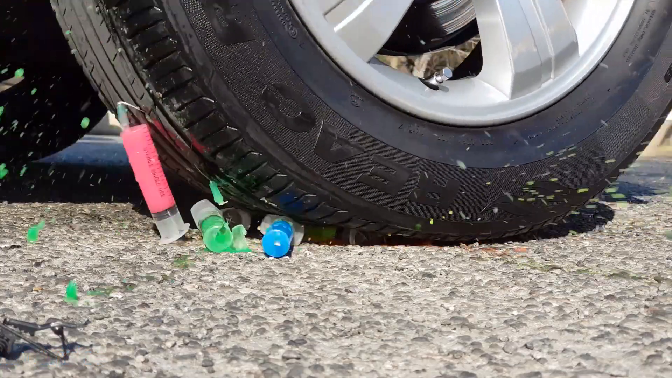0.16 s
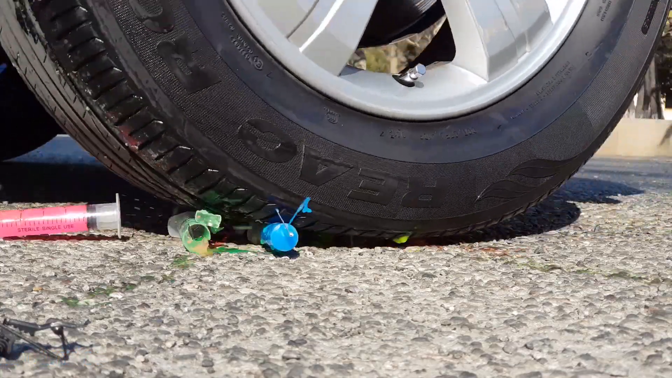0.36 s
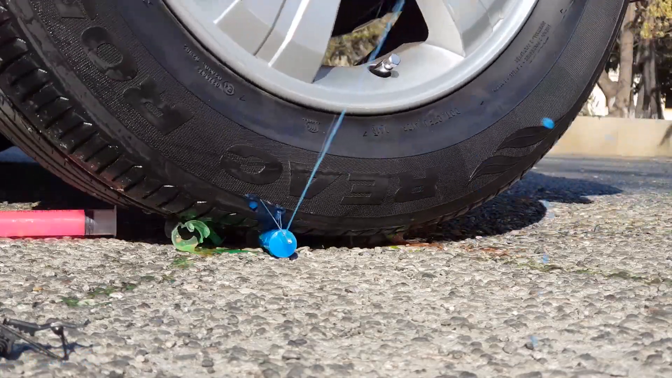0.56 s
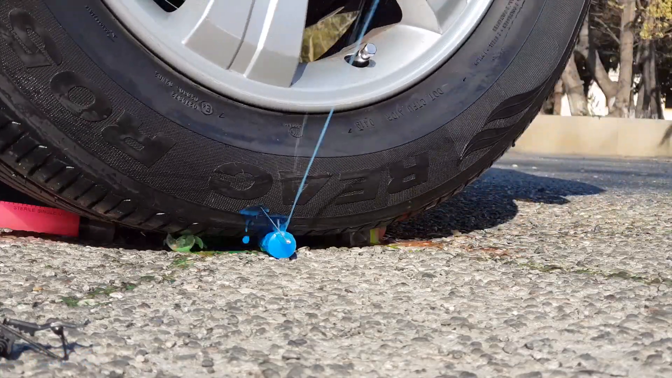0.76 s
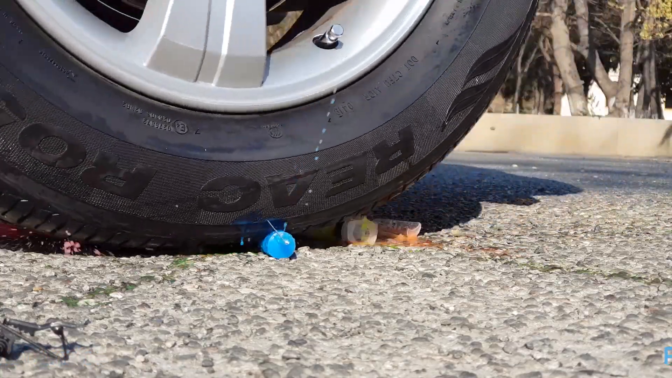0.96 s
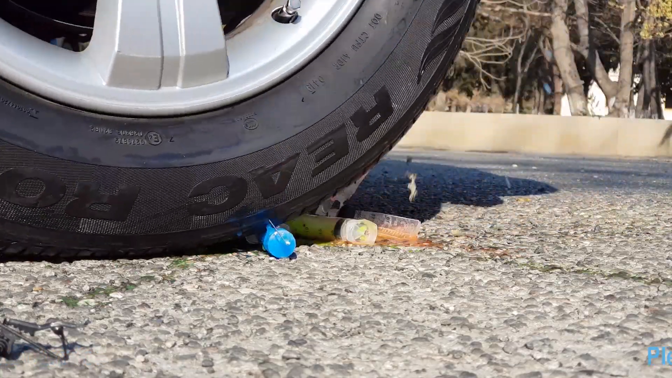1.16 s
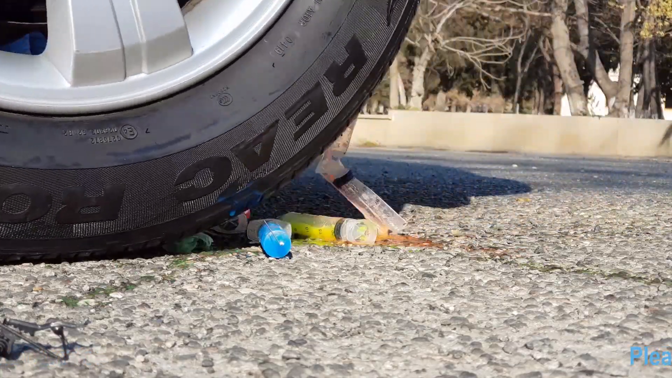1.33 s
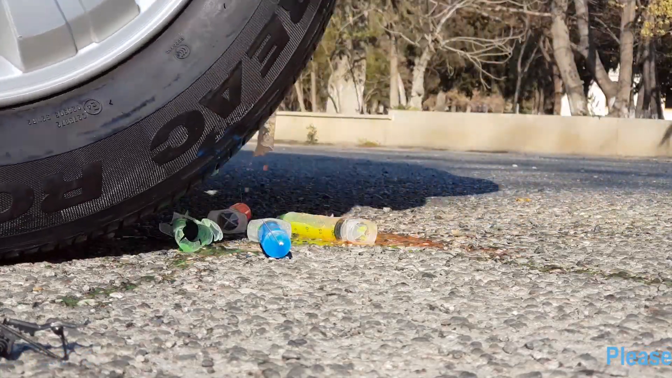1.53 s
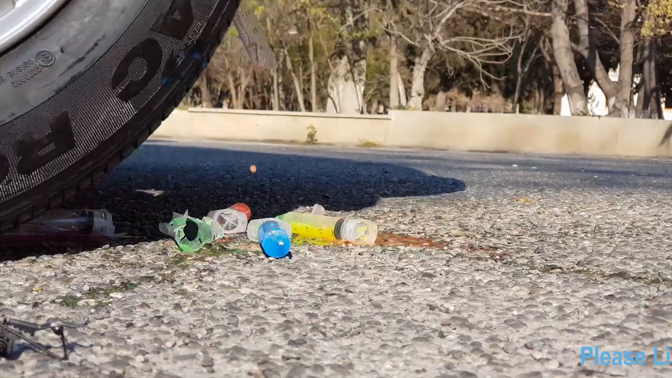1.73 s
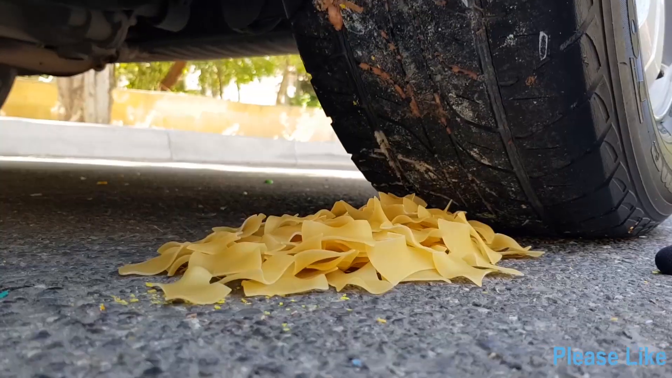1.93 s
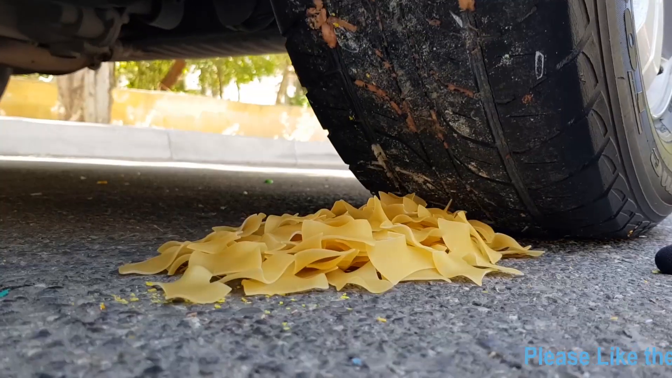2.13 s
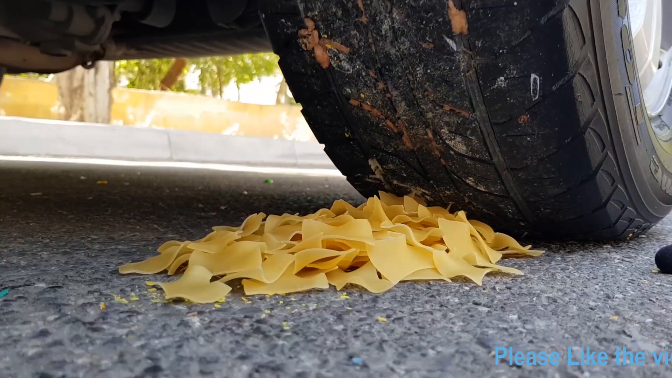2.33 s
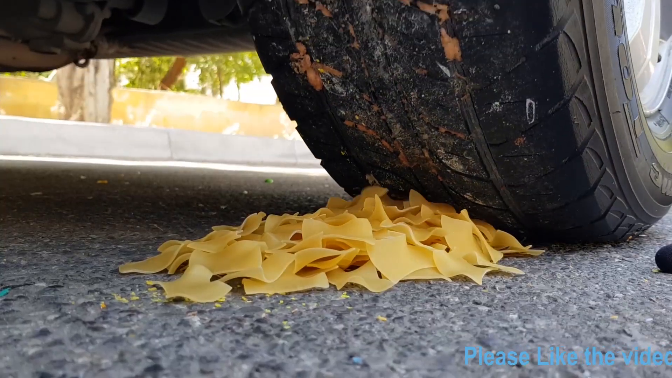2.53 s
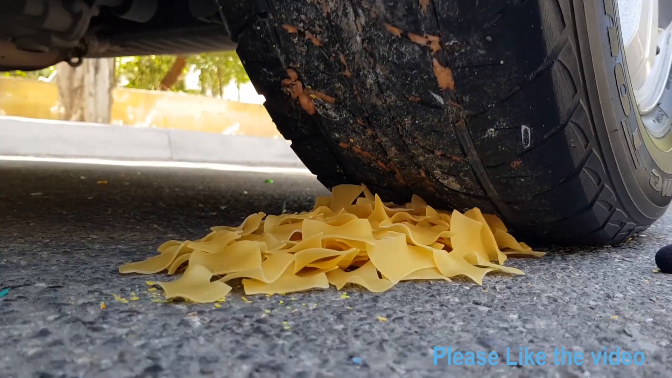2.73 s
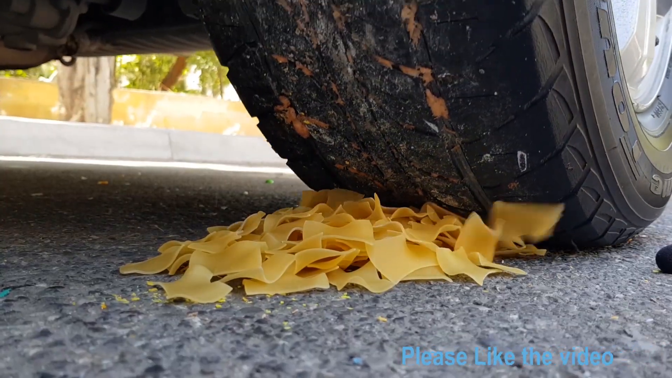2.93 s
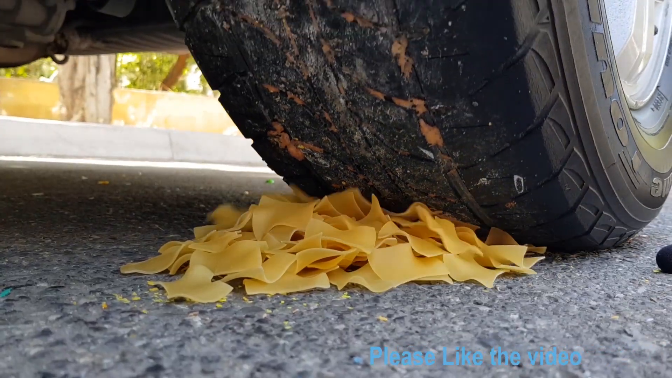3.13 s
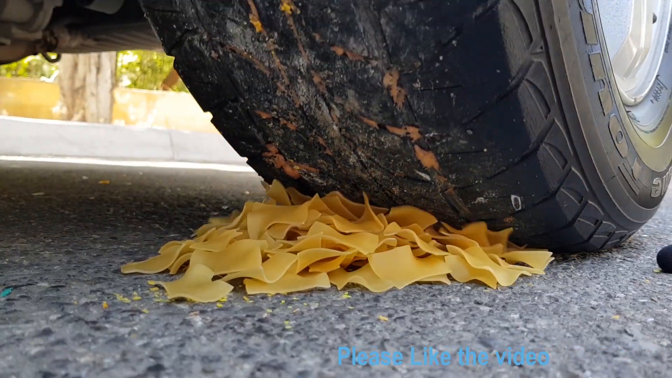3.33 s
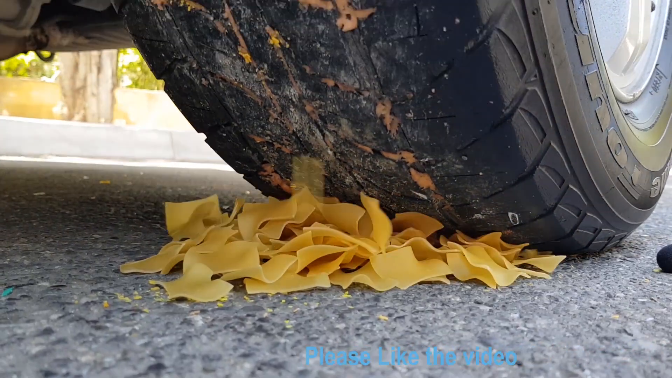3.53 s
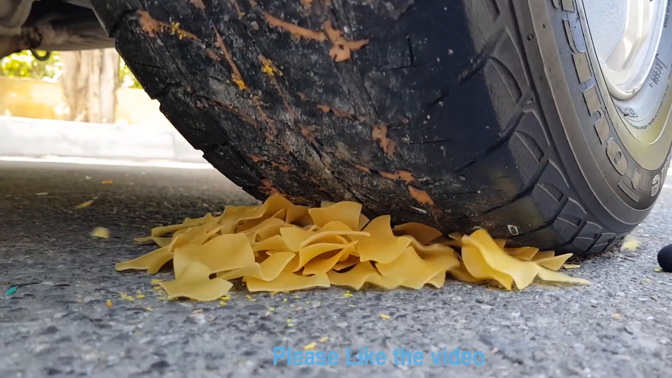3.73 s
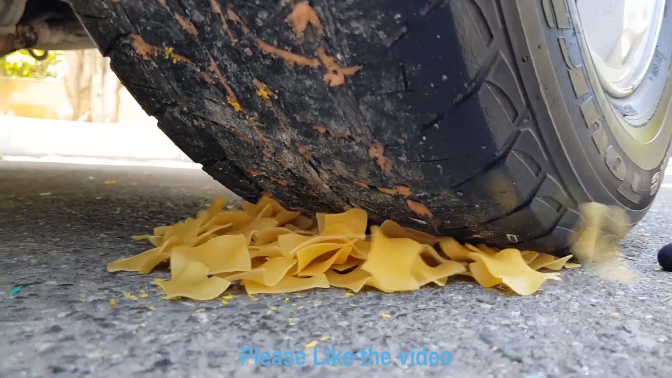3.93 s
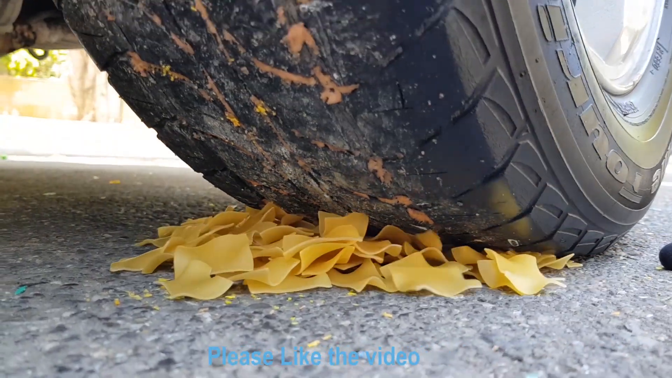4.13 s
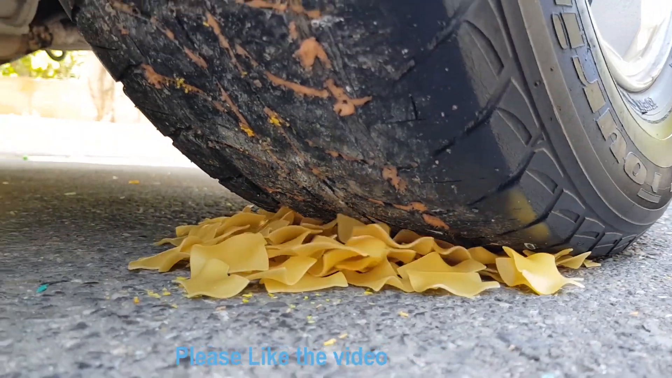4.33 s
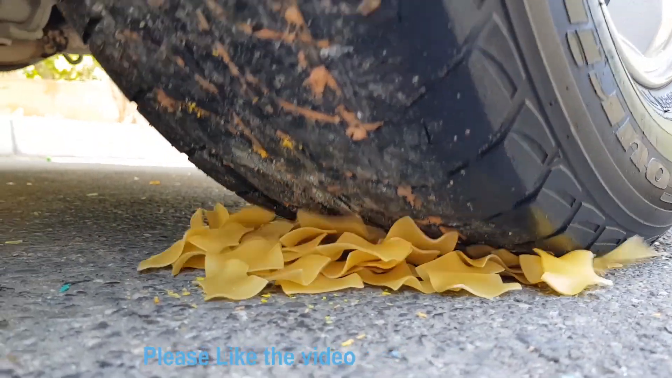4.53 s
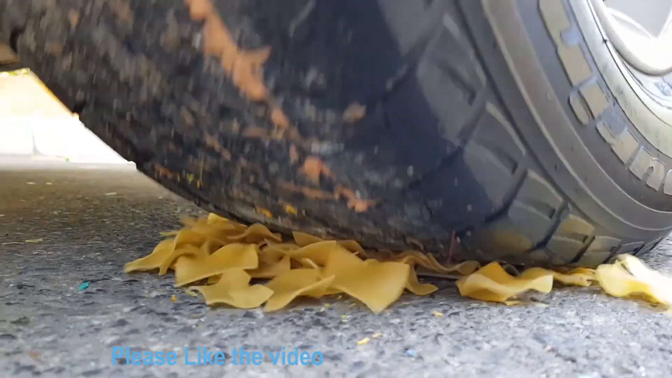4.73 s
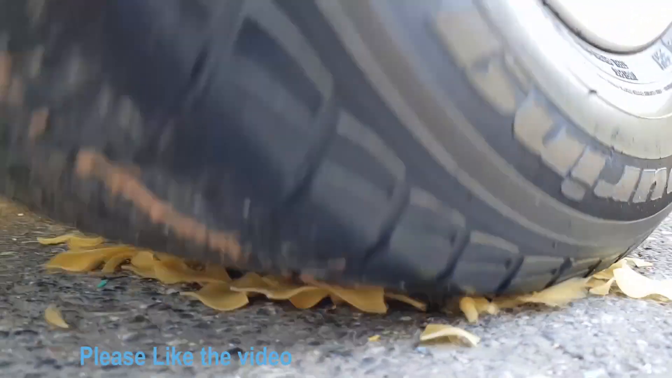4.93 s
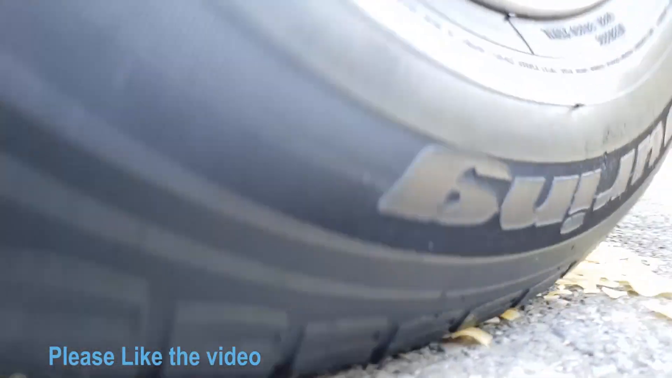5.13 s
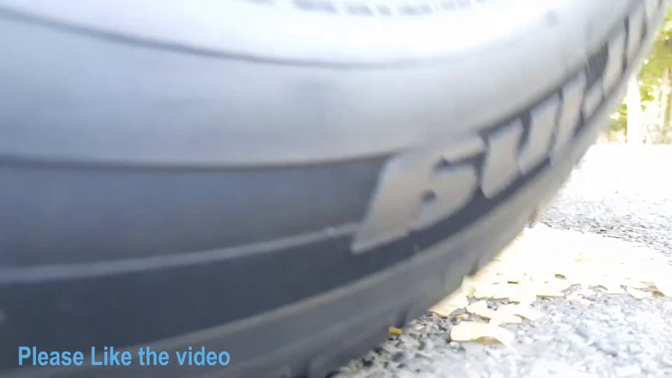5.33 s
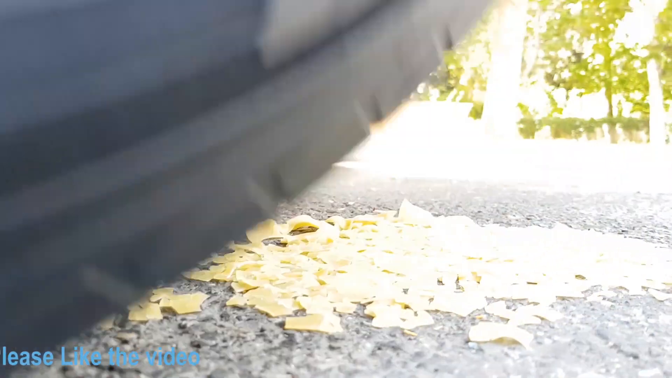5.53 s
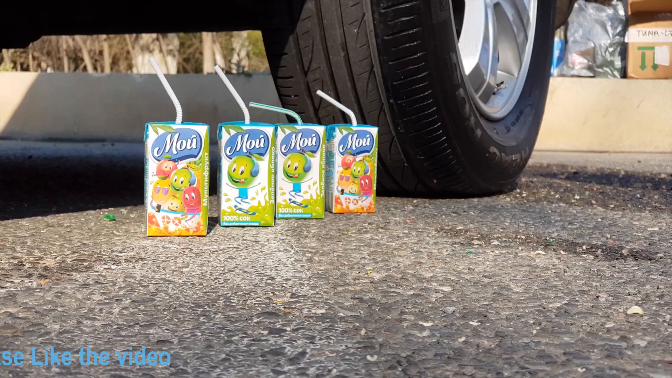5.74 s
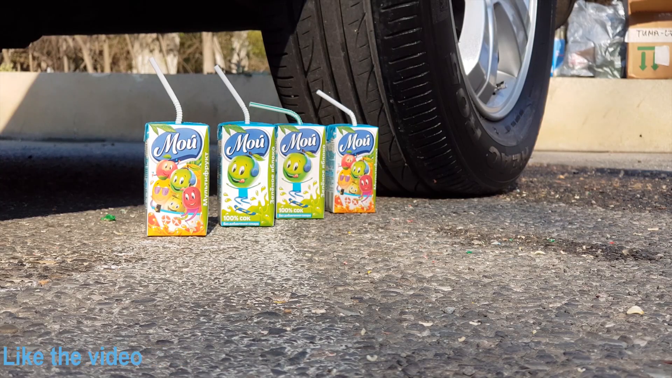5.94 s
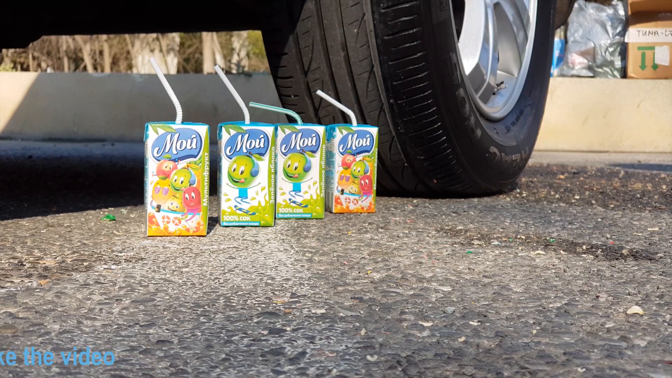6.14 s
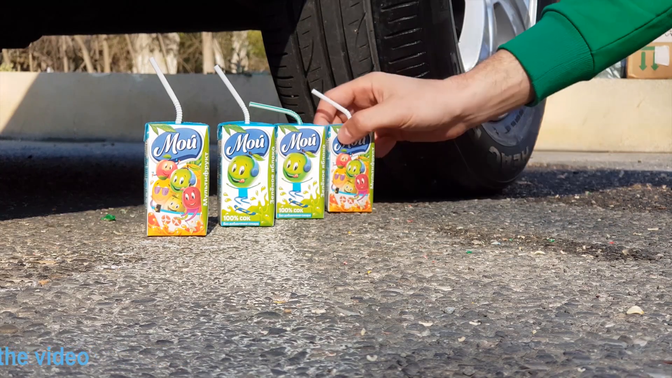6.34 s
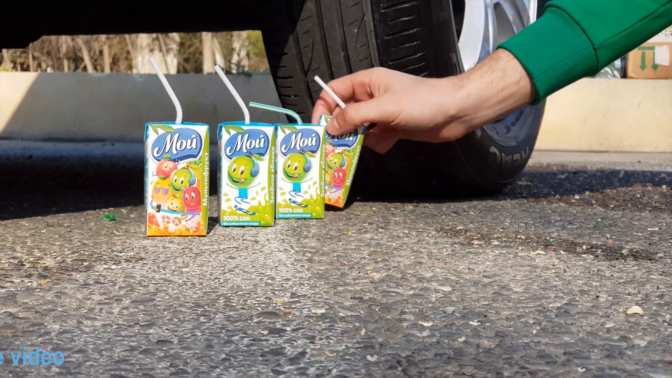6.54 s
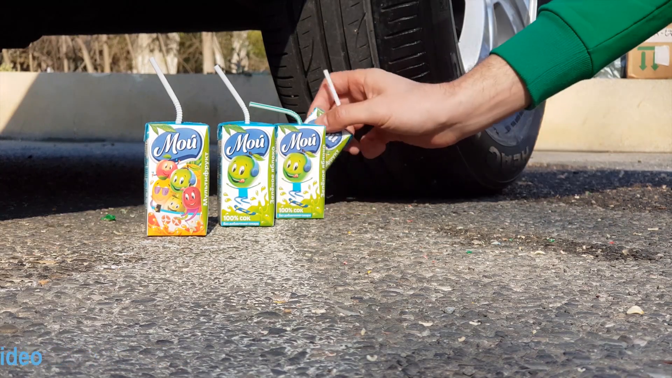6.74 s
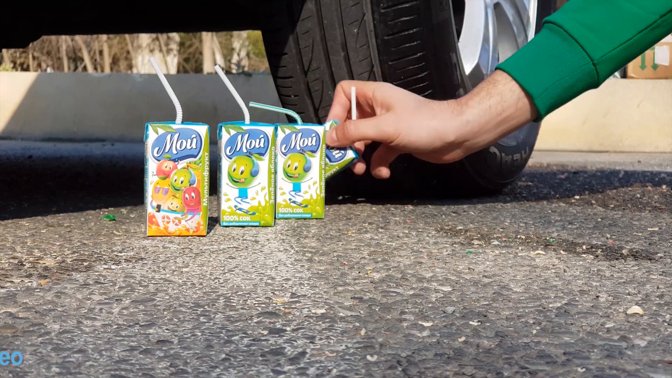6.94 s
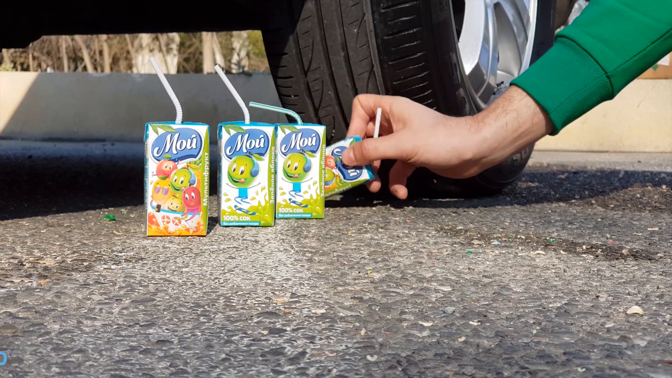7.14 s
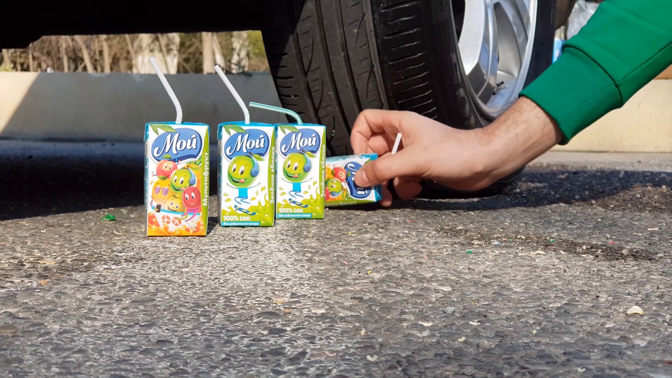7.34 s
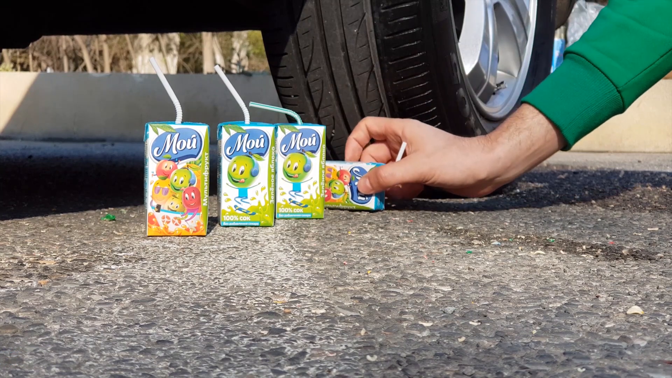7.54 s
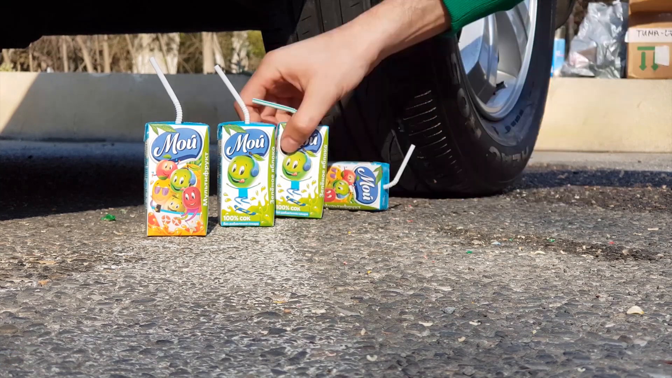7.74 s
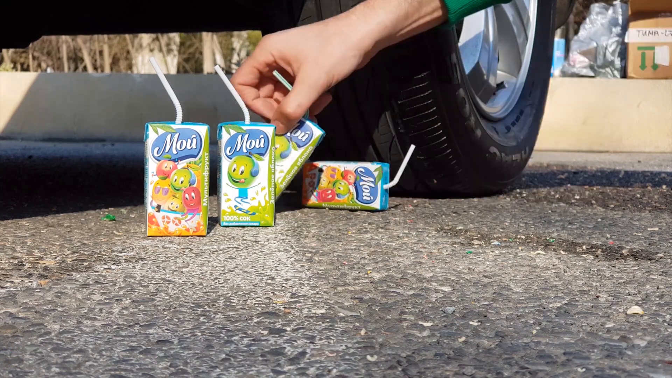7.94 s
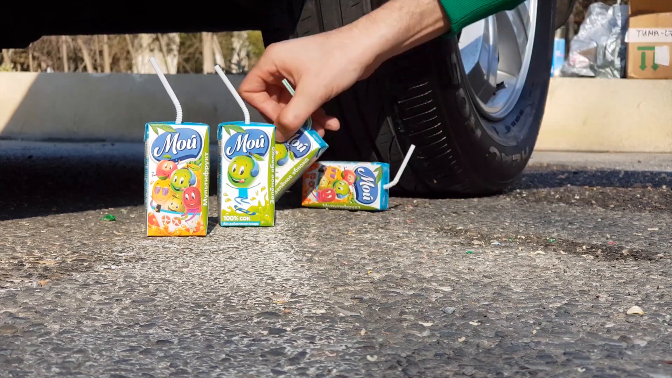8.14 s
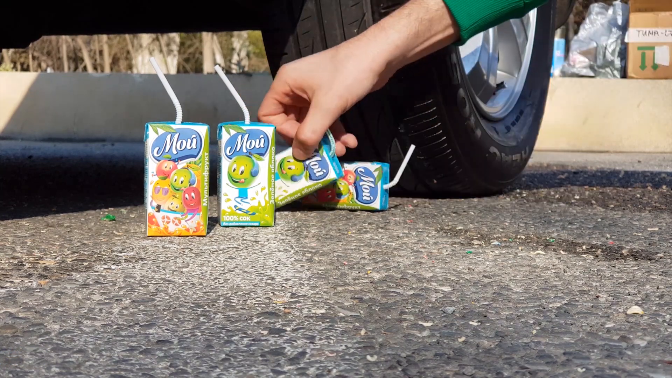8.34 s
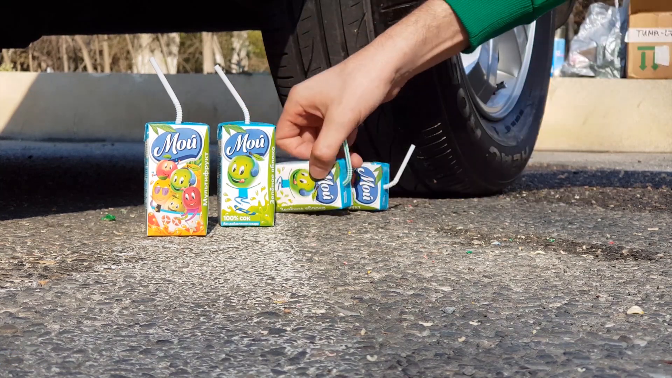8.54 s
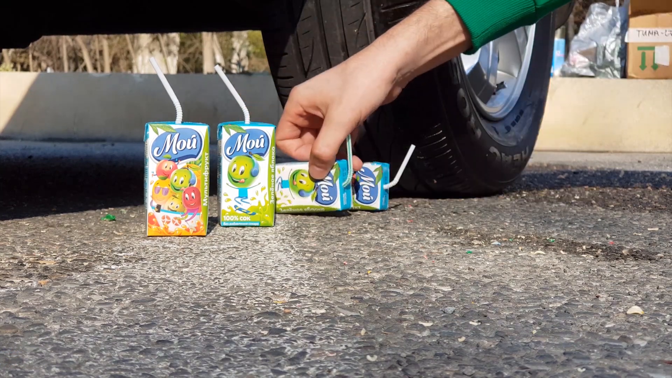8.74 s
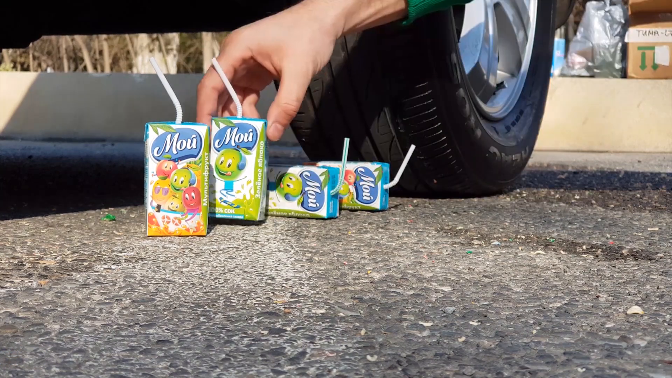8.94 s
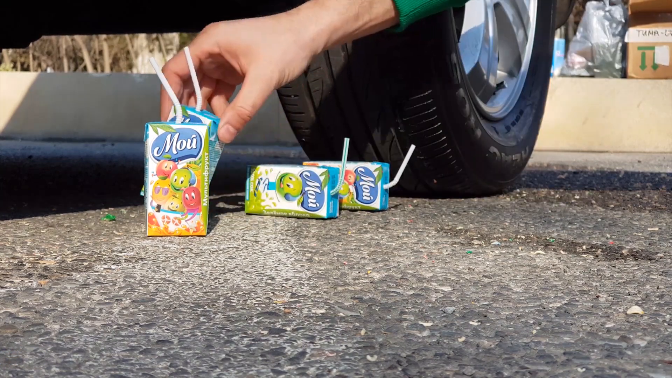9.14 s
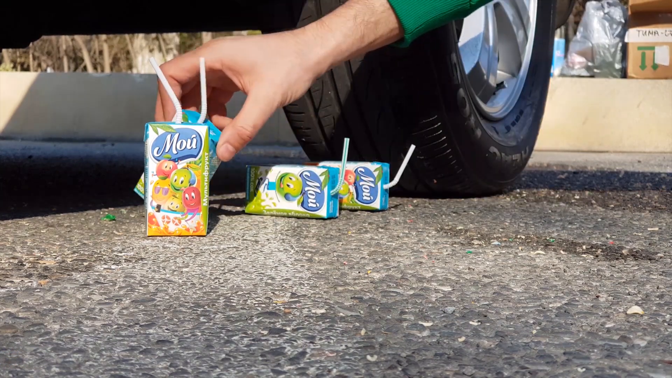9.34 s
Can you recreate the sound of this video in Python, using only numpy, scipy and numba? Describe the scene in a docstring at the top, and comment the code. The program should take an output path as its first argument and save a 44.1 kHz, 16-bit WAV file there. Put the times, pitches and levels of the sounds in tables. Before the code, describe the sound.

Outdoors, very close to the ground, a car tyre breaks plastic syringes with sharp bright clicks, hollow barrel knocks and grainy splintering. After a short lull, it creeps onto dry pasta, which snaps and crackles densely over low thumps, then rolls through. The crunch stops, and low uneven wind buffets the microphone over faint town hiss.

```python
"""Over faint town hiss, plastic syringes crack under a car tyre: clicks, barrel resonances, grainy tails.
The tyre then crushes a heap of dry pasta: noise bursts and crackle, tones and filtered noise in the closing gap.
Decaying low sines thump tyre and ground throughout the crushing; sparse ticks of debris follow the breaks.
Last, slow-gusting noise bands and low decaying sines buffet the microphone over the distant town.
The sum clips at full scale on the loudest snaps and loses its extreme treble."""
import sys
import numpy as np
from scipy import signal
from scipy.fft import rfft, irfft
from scipy.io import wavfile
from scipy.ndimage import uniform_filter1d
from numba import njit

SR = 44100
rng = np.random.default_rng(int(sys.argv[2]) if len(sys.argv) > 2 else 0)


def wrap_up_sound(samples):
    """Save the sound to the file named by the first command line argument, as 16-bit audio."""
    columns = np.atleast_2d(samples).T
    # keep every value between -1 and 1, then stretch to whole-number steps
    tamed = np.clip(columns, -1, 1)
    steps = np.round(tamed * 32767).astype(np.int16)
    wavfile.write(sys.argv[1], SR, steps)


N = 413658

# Steady background. Each row: start in seconds, levels in dB of town, hum and light wind,
# deep wind band in dB re upper band.
BACKGROUND = [(0, -45, -66, -70, 14), (1.831, -42.5, -53, -57.5, 25.5), (2.03, -42, -54, -60.5, 22.5),
              (3.95, -45.5, -56, -65, 16), (5.099, -58, -61.5, -63.5, 3), (5.673, -38.5, -48.5, -60, -4),
              (6.312, -51, -67, -60, 0)]
# Strong wind. Each row: time in seconds, level of the upper band in dB.
GUSTS = [(5.67, -35), (5.78, -29.5), (5.98, -40), (6.08, -33.5), (6.36, -31.5), (6.55, -40.5),
         (6.65, -37.5), (6.85, -44.5), (7.1, -37.5), (7.65, -49), (7.83, -41.5), (7.96, -32), (8.2, -36.5),
         (8.36, -30.5), (8.58, -39.5), (8.66, -29.5), (8.82, -32.5), (8.93, -46), (9.0, -34), (9.08, -48),
         (9.22, -38.5), (9.38, -52)]
# Crushing. Each row: time in seconds, crackle level in dB, relative gap drive in dB, gap pitch in Hz.
CRUSHING = [(2.27, -41, 5, 2350), (2.445, -25.5, -13, 2330), (2.472, -16, -33, 710),
            (2.505, -18.5, -3, 725), (2.55, -29, -15, 761), (2.62, -17.5, -20, 1000),
            (2.84, -26.5, -6.5, 769), (3.01, -20, 1, 1100), (3.28, -34, -2.5, 1053),
            (3.33, -15, -12.5, 850), (3.4, -7.5, -7, 900), (3.42, -23, -2, 900), (3.44, -12, -7, 999),
            (3.67, -14.5, -5, 1100), (3.95, -19, -3.5, 1120), (4.05, -28, 3.5, 1450),
            (4.2, -24, -17.5, 1345), (4.42, -34.5, -22, 1395), (4.57, -13, -6.5, 1000),
            (4.73, -10.5, -10.5, 1311), (4.91, -12.5, -1, 1083), (5.06, -14.5, -4.5, 1350),
            (5.17, -26.5, 0, 1570), (5.22, -52.5, -0.5, 1850), (5.36, -69, -5, 1900)]
# Loud pasta snaps. Each row: time in seconds, relative level in dB, T60 in seconds,
# relative gap ring level in dB, gap ring pitch in Hz.
LOUD_SNAPS = [(2.2693, -5, 0.0016, -4.5, 2120), (2.336, -5, 0.0023, -9, 2100),
              (2.402, -3.5, 0.0026, -6, 2200), (2.427, -12.5, 0.0072, -21, 660),
              (2.5035, -11, 0.0083, -14.5, 620), (2.609, -6, 0.019, -21, 780),
              (2.617, -20, 0.0096, -33, 1080), (2.646, 1, 0.011, -11.5, 1680),
              (2.6561, -5, 0.022, -18.5, 790), (2.6829, -4, 0.02, -16, 2440), (2.697, -2, 0.015, -4.5, 930),
              (2.725, -2.5, 0.0056, -4.5, 670), (2.7663, -7, 0.003, -34, 730), (2.776, -4, 0.007, -12, 790),
              (2.7987, -3.5, 0.034, -7, 600), (2.8152, -4, 0.039, -14, 676), (2.8338, -4, 0.016, -17, 724),
              (2.8504, -2, 0.0048, -7, 750), (2.8616, 4, 0.0032, -16.5, 880),
              (2.8706, -0.5, 0.013, -11.5, 800), (2.876, -2, 0.012, -19, 1030),
              (2.8856, 1.5, 0.0161, -9, 840), (2.8936, -3, 0.0055, -19, 910),
              (2.9033, -8, 0.0044, -9.5, 1580), (2.9183, 0, 0.0069, -8.5, 824),
              (2.9317, -5, 0.0048, -2, 840), (2.943, -3.5, 0.029, -11, 870), (2.9497, 3.5, 0.014, -16, 645),
              (2.9646, -2, 0.0059, -7, 750), (2.9795, -5.5, 0.059, -3, 1520),
              (2.9968, -2.5, 0.015, -3.5, 880), (3.0037, -0.5, 0.01, -5.5, 1185),
              (3.0212, 0.5, 0.0264, -9, 1200), (3.031, -4.5, 0.011, -15.5, 840),
              (3.0447, -12.5, 0.004, -10, 1270), (3.0578, -5.5, 0.0084, -9, 730),
              (3.0646, 2.5, 0.031, -5.5, 1230), (3.0847, -1.5, 0.015, -2, 1250),
              (3.0914, -5, 0.049, -7.5, 910), (3.1005, -5, 0.015, -0.5, 1230),
              (3.1396, -1.5, 0.0086, -4.5, 890), (3.15, 7.5, 0.0098, -11.5, 1030),
              (3.1568, 6, 0.0051, -2.5, 1220), (3.1627, 1, 0.025, -7, 1100),
              (3.176, 0.5, 0.013, -0.5, 1130), (3.1851, -2.5, 0.036, -3, 1290),
              (3.1998, -7.5, 0.045, -7.5, 1070), (3.2178, 0.5, 0.029, -9, 830),
              (3.2387, -1.5, 0.0091, -11, 890), (3.247, -2, 0.0092, -24, 1200),
              (3.254, 0, 0.0036, -23.5, 920), (3.2648, -6, 0.0057, -24.5, 1750),
              (3.2718, -6, 0.026, -26, 1110), (3.3, -1, 0.0037, -16.5, 775), (3.313, -3, 0.01, -15.5, 1020),
              (3.3152, 0, 0.03, -9, 700), (3.3297, -7, 0.0085, -4, 2110), (3.336, -4.5, 0.013, -11.5, 740),
              (3.3452, -1.5, 0.017, -10, 710), (3.365, -7, 0.03, -3, 730), (3.3765, -6.5, 0.014, -9, 950),
              (3.3929, -5, 0.019, -6, 2310), (3.4305, -2.5, 0.05, -10.5, 1100),
              (3.462, 5, 0.011, -7.5, 810), (3.487, -6, 0.037, -8, 920), (3.5053, -5, 0.0028, 2, 595),
              (3.509, 4, 0.018, -6, 940), (3.5235, -2, 0.0083, -13.5, 1320),
              (3.5456, -3.5, 0.0031, -4, 2370), (3.553, 0, 0.0021, -17, 860), (3.5702, -2, 0.052, -12, 740),
              (3.5909, -1.5, 0.023, 1.5, 1050), (3.6, -1.5, 0.0063, -18.5, 960),
              (3.6282, -0.5, 0.0098, -5, 1020), (3.638, -11, 0.0039, -3, 1020),
              (3.646, -5, 0.0092, -13, 1390), (3.6525, 0.5, 0.013, -21, 1040),
              (3.663, -6, 0.017, -13.5, 920), (3.6897, -5.5, 0.009, -9, 1600),
              (3.7102, -3, 0.006, -6, 1100), (3.7152, -8, 0.011, -6.5, 860), (3.73, -13, 0.013, -8, 1140),
              (3.7395, -6, 0.059, -10.5, 760), (3.7809, -12.5, 0.0033, -4, 1220),
              (3.7946, -5, 0.0066, -7.5, 1270), (3.807, -6, 0.043, -10.5, 1340),
              (3.8224, -3, 0.038, -7, 970), (3.8546, 0, 0.018, -9, 750), (3.8729, -2, 0.0034, -12, 1170),
              (3.879, -3, 0.004, -13, 1200), (3.8978, 1.5, 0.019, -18, 1300),
              (3.909, -4.5, 0.0083, -20.5, 825), (3.929, 0, 0.027, -10, 820),
              (3.9432, 0, 0.039, -14.5, 1220), (3.9698, 0, 0.0049, -25, 1280),
              (3.987, 1.5, 0.0049, -22, 700), (4.0001, -4, 0.0052, -8, 1800), (4.0107, -4, 0.013, 4, 1500),
              (4.041, -5, 0.0064, 0, 1420), (4.055, -0.5, 0.02, -3, 1480), (4.0701, -3, 0.021, -0.5, 1210),
              (4.0852, -12, 0.0042, -19, 1550), (4.111, -2, 0.011, -9, 1280),
              (4.1234, -6, 0.0127, -14.5, 1250), (4.143, -8, 0.0039, -35, 1530),
              (4.154, -10, 0.0067, -10, 1850), (4.1749, -4.5, 0.016, -24, 1360),
              (4.2005, -6, 0.028, -19.5, 680), (4.225, -7, 0.0073, -26.5, 1390),
              (4.239, -4, 0.0097, -17.5, 1690), (4.2439, 0, 0.018, -18, 770), (4.257, 1, 0.0078, -11, 1550),
              (4.274, -8.5, 0.048, -8.5, 1280), (4.295, -10, 0.0064, -13, 1490),
              (4.302, -8, 0.0045, -8, 1420), (4.3091, -5, 0.028, -9.5, 1360),
              (4.3253, -5.5, 0.0086, -15, 1280), (4.3366, -5, 0.0071, -22, 1190),
              (4.3442, -1, 0.0088, -22.5, 920), (4.37, -5.5, 0.0089, -25, 1290),
              (4.376, -10.5, 0.024, -25, 1170), (4.399, -9, 0.011, -38, 2360),
              (4.408, -8, 0.0052, -42, 1810), (4.4332, -4.5, 0.0078, -20, 1640),
              (4.459, -8, 0.01, -31, 1260), (4.4644, -7.5, 0.011, -27, 1140),
              (4.492, -1, 0.0083, -30.5, 1580), (4.5064, -8, 0.019, -12.5, 915),
              (4.5148, -3, 0.028, -7.5, 1470), (4.5352, 0, 0.018, -10.5, 890),
              (4.5526, -4, 0.0049, -8.5, 1390), (4.5657, 0, 0.034, -11, 1210), (4.613, -3, 0.071, -5, 835),
              (4.6254, -3, 0.0081, -8.5, 1310), (4.7092, -2.5, 0.055, -8, 1110),
              (4.722, -6, 0.074, -7, 1610), (4.749, -5.5, 0.0088, -7, 1440),
              (4.7582, -1, 0.013, -9.5, 1240), (4.78, 2.5, 0.016, -9.5, 1490),
              (4.7962, 3, 0.009, -15, 1380), (4.8051, -4, 0.013, -9, 950), (4.8233, -3, 0.0071, -15.5, 960),
              (4.8636, -6, 0.018, -11, 1120), (4.879, 0, 0.025, -7.5, 980), (4.9062, -1.5, 0.014, 0, 940),
              (4.9503, -4.5, 0.019, -10, 1290), (5.0185, -7, 0.02, -10, 1050),
              (5.048, -22, 0.047, -7, 1130), (5.078, -12, 0.0063, -16, 1780),
              (5.0958, -12, 0.0057, -17, 1950), (5.1093, -13.5, 0.0053, -5, 2100),
              (5.1383, -9.5, 0.0077, -6, 1940), (5.1802, -24, 0.0056, -11, 1740),
              (5.231, -24, 0.013, -4.5, 1900), (5.2521, -34, 0.0042, -27, 2290),
              (5.33, -38.5, 0.0048, -34, 1810), (5.6038, -49, 0.017, -54, 600)]

TYRE_AIR_HZ = 224
ROLLS_ON_S = 4.49  # until then the tyre creeps in jerks


def undb(db):
    """Amplitude factor of a level in dB."""
    return 10 ** (np.asarray(db) / 20)


def unit(x):
    """Scale to rms 1."""
    return x / np.sqrt(np.mean(x ** 2))


def noise():
    """White noise, rms near 1."""
    return rng.standard_normal(N)


def curve(table):
    """Columns of a table, joined by straight lines in time."""
    s, *columns = np.transpose(table)
    return [np.interp(np.arange(N) / SR, s, c) for c in columns]


def held(s, value):
    """The value of the latest event at every sample; the first value before any event."""
    order = np.argsort(s)
    latest = np.searchsorted(s[order], np.arange(N) / SR) - 1
    return value[order][np.clip(latest, 0, None)]


def stretch(column):
    """A column of the background table at every sample."""
    rows = np.array(BACKGROUND)
    return held(rows[:, 0], rows[:, column])


def colour(x, points):
    """Minimum-phase filter through (Hz, dB) points, scaled to power gain 1 on white noise."""
    hz, db = np.transpose(points)
    bin_hz = np.arange(1, 2050) * SR / 4096
    log_gain = np.log(undb(np.interp(np.log(bin_hz), np.log(hz), db)))
    cepstrum = irfft(log_gain)
    cepstrum[1:2048] *= 2  # fold onto positive time
    cepstrum[2049:] = 0
    response = irfft(np.exp(rfft(cepstrum)))[:2048]
    return signal.fftconvolve(x, response / np.sqrt(np.sum(response ** 2)))[:N]


@njit
def svf(x, hz, damp):
    """State-variable band-pass with a moving centre; damp = width / centre, peak gain 1."""
    y, b, l = np.empty(len(x)), 0., 0.
    for i in range(len(x)):
        g = np.tan(np.pi * hz[i] / SR)
        v = (b + g * (x[i] - l)) / (1 + g * (g + damp))
        b, l, y[i] = 2 * v - b, l + 2 * g * v, damp * v
    return y


def band(x, hz, *damps):
    """Band-passes in series at one steady centre."""
    for damp in damps:
        x = svf(x, np.full(N, float(hz)), damp)
    return x


def bursts(s, db, t60, hz=None, bend=0.84, sag=0.):
    """Sum of sudden decays (bend over 1 holds, then drops); with hz, sines that start sharp by share sag."""
    out = np.zeros(N + SR)
    s, db, t60 = np.broadcast_arrays(s, db, np.clip(t60, .001, .9))
    for k in range(len(s)):
        t = np.arange(int(t60[k] * SR) + 2) / SR
        shape = undb(db[k] - 60 * (t / t60[k]) ** bend)
        if hz is not None:
            advance_s = sag * t60[k] / 8 * (1 - np.exp(-8 * t / t60[k]))
            shape = shape * np.sin(2 * np.pi * hz[k] * (t + advance_s))
        start = int(max(s[k], 0) * SR)
        out[start:start + len(t)] += shape
    return out[:N]


def walk(rate):
    """Random levels held 1 / rate s and smoothed twice, rms 1."""
    k = int(SR / rate)
    steps = np.repeat(rng.standard_normal(N // k + 1), k)
    return unit(uniform_filter1d(uniform_filter1d(steps, k), k)[:N])


def crackle(per_s, scatter_db, t60):
    """Decaying envelope of random small breaks, rms 1; their level scatter is capped."""
    level_db = scatter_db * np.minimum(rng.standard_exponential(N), 2.5)
    hit = (rng.random(N) < per_s / SR) * undb(level_db)
    return unit(signal.lfilter([1], [1, -undb(-60 / (t60 * SR))], hit))


def town():
    """Smooth distant hiss whose colour switches, a wavering idling-engine hum and one thin rustle."""
    # One list per colour. Each row: frequency in Hz, relative density in dB.
    town_colours = ([(88, -7), (150, 8), (376, -18), (457, -12.5), (601, -14.5), (1870, -21), (9630, -35.5),
                    (16000, -43)], [(88, -54.5), (150, -19.5), (222, -4.5), (391, -8.5), (589, -1),
                    (821, -7.5), (2270, -18.5), (13400, -27), (16000, -28.5)], [(88, -23.5), (150, -11.5),
                    (354, -21.5), (960, -24.5), (1500, -28), (2220, -29.5), (11000, -44), (13200, -46),
                    (16000, -57)])
    # The colour index of each background stretch.
    colour_order = [0, 1, 1, 1, 0, 2, 2]
    # Faint bands in the third colour. Each row: centre in Hz, width in Hz, level in dB re hiss.
    whines = [(790, 31, -13), (966, 19.6, -13), (2206, 35, -18.5), (3305, 340, -16), (6280, 67, -26),
              (12300, 300, -25)]
    drone_hz, drone_width_hz, drone_db = 780, 30, -11.5  # re hiss, second colour
    hum_hz = 225.8
    rustle_s, rustle_half_s, rustle_hz, rustle_db = 6.265, .04, 6400, -41.5

    t = np.arange(N) / SR
    beds = [unit(colour(noise(), points)) for points in town_colours]
    for hz, width_hz, db in whines:
        beds[2] = beds[2] + undb(db) * unit(band(noise(), hz, width_hz / hz))
    beds[1] = beds[1] + undb(drone_db) * unit(band(noise(), drone_hz, drone_width_hz / drone_hz))
    chosen = held(np.array(BACKGROUND)[:, 0], np.array(colour_order))
    hiss = np.choose(chosen, beds) * undb(stretch(column=1))
    hum = undb(stretch(column=2)) * unit(band(noise(), hum_hz, 0.01))
    swell = np.exp(-((t - rustle_s) / rustle_half_s) ** 2 / .5)
    rustle = undb(rustle_db) * swell * unit(band(noise(), rustle_hz, 0.31))
    return hiss * undb(walk(3.5)) + hum + rustle


def wind():
    """Turbulence at the microphone port: low noise bands that gust together, and single buffets."""
    # Each row: time in seconds, relative level in dB, pitch in Hz.
    buffets = [(5.905, -21, 124), (6.198, -23, 122), (6.372, -11.5, 112), (6.715, -19, 80),
               (6.925, -22, 100), (7.071, -22, 130), (7.09, -24, 240), (7.941, -20, 102), (8.033, -14, 125),
               (8.101, -15, 90.4), (8.172, -19.5, 140), (8.353, -14, 118), (8.386, -24, 150),
               (8.638, -15, 100), (8.761, -15, 129.5)]
    buffet_cycles = 10.8  # to -60 dB
    deep_sway_db = 1.5  # rms drift of the balance of the bands
    upper_hz = 128

    windy = np.arange(N) / SR >= GUSTS[0][0]
    db = np.where(windy, curve(GUSTS)[0], stretch(column=3))
    deep_db = stretch(column=4) + deep_sway_db * walk(4.5)
    gust = undb(3 * np.tanh(walk(25)) + .7 * walk(8))
    flutter = unit(band(gust * noise(), upper_hz, 0.3, 0.83, 0.83))
    rumble = gust * noise()
    deep_hz = np.where(windy, 66., 56.)
    for damp in (0.82, 0.86, 0.86):
        rumble = svf(rumble, deep_hz, damp)
    # the strongest gusts reach an octave higher
    slap = unit(band(gust ** 2 * noise(), 2 * upper_hz, .6, 1.0))
    port = undb(db) * (flutter + undb(deep_db) * unit(rumble) + undb(-18.5) * slap)
    s, buffet_db, hz = np.transpose(buffets)
    port = port + band(bursts(s, buffet_db, buffet_cycles / hz, hz, bend=0.8), upper_hz, 1.5)
    return signal.sosfilt(signal.butter(4, 42, "high", fs=SR, output="sos"), port)


def debris():
    """Faint ticks of falling bits at random pitches, among the syringes and after the heap is flat."""
    per_s, rms_db = 30, -56
    t, steps = np.arange(N) / SR, np.arange(0, N / SR, 1 / per_s)
    pitch = held(steps, 2000 * 2 ** (2 * rng.random(len(steps))))
    after_heap = (t > CRUSHING[-2][0]) & (t < GUSTS[0][0])
    falling = (t < BACKGROUND[1][0]) | after_heap
    ticks = svf(svf(noise() * crackle(per_s, 5, .01), pitch, .8), pitch, 1.)
    return falling * undb(rms_db) * unit(ticks)


def syringes():
    """Each crack: a click in its own band, barrel resonances and a grainy tail of splinters and spray."""
    # Each row: time in seconds, relative click level in dB, centre in Hz,
    # relative body and shatter tail levels in dB re click.
    cracks = [(.006, -2, 5870, -10.5, -27.5), (0.017, 0.5, 6940, -19.5, -12.5),
              (0.0247, -8.5, 4240, -0.5, -9.5), (0.0418, -2.5, 8900, -2.5, -8),
              (0.1419, -3.5, 7340, -52.5, -18.5), (0.1772, -12, 2950, -39.5, -18),
              (0.2036, -25, 2600, -24, -21), (0.2269, -15.5, 5070, -29, -13.5),
              (0.253, -4, 4300, -24, -25.5), (0.3087, -29, 5400, -5, -21), (0.391, -26, 6100, -31, -15),
              (0.59, -26, 7240, -19.5, -12.5), (0.635, -12.5, 5500, -20.5, -20.5),
              (.644, 3, 8900, -11, -12.5), (0.655, -7.5, 4030, -6, -22.5), (.7041, -3, 4970, -14, -26.5),
              (0.727, -1.5, 6800, -9.5, -16), (0.8372, -16.5, 4830, -26, -16),
              (.876, -3.5, 6200, -11.5, -17.5), (0.943, 2, 8700, -4.5, -13.5),
              (0.9629, 3.5, 5800, -23, -35.5), (0.9954, -2, 4830, -7.5, -43),
              (1.0382, -1.5, 2620, -3, -7.5), (1.074, -8, 4600, -4, -33), (1.0879, -1, 2640, -23, -23.5),
              (1.1253, -20, 3560, -29, -26), (1.3356, -26.5, 6400, -38, -28), (1.346, -34, 5800, -26, -12),
              (1.3615, -22.5, 5260, -43, -30), (1.447, -39.5, 1500, -34, -22),
              (1.495, -22.5, 6750, -42, -21), (1.59, -37.5, 2100, 1, -24)]
    # Barrel resonances. Each row: centre in Hz, width in Hz, relative level in dB.
    barrel_modes = [(190, 180, 2.5), (368, 128, 0.5), (650, 180, -9), (835, 290, -4.5), (1190, 310, -13)]
    # Each row: frequency in Hz, relative density in dB.
    shatter_colour = [(180, -29.5), (300, -15), (584, -3.5), (1390, -10), (1610, -5.5), (2740, -5.5),
                      (9090, -9.5), (11900, -12), (16000, -26)]
    # Loose lengths of barrel. Each row: time in seconds, level in dB, pitch in Hz.
    loose_rings = [(.016, -13.5, 506), (.024, -10, 1560), (.040, -8, 569), (.047, -13, 865),
                   (.052, -13.5, 1180), (.254, -23, 810), (.646, -11, 360), (.728, -21.5, 770),
                   (.728, -15, 1500), (.877, -17, 520), (.996, -15, 840), (1.039, -3.5, 1740),
                   (1.048, -9.5, 1700), (1.088, -15, 2200)]
    tail_t60_s, body_t60_s = 0.11, 0.14
    scuff_s, scuff_db, scuff_hz, scuff_t60_s = 1.607, -28, 2050, 0.098  # level before filtering
    barrel_cycles = 35  # to -60 dB

    s, db, hz, body_db, tail_db = np.transpose(cracks)
    pitch = held(s, np.clip(hz, 500, 15000))
    click = noise() * bursts(s, db, 0.0064)
    click = undb(9.5) * svf(click, pitch, 0.63) + undb(-27.5) * click
    grain = 0.5 + 0.48 * crackle(400, 3.2, 0.0064)
    tail = colour(noise() * grain * bursts(s, db + tail_db, tail_t60_s), shatter_colour)
    tail = 1.2 * tail + 1.3 * svf(svf(tail, pitch, 1.0), pitch, 1.0)
    push = noise() * grain * bursts(s, db + body_db, body_t60_s)
    body = sum(undb(g) * band(push, f, width / f) for f, width, g in barrel_modes)
    # a splinter scrapes the ground
    scrape = noise() * grain * bursts([scuff_s], scuff_db, scuff_t60_s, bend=1.5)
    scuff = band(scrape, scuff_hz, 0.49, 0.45)
    ring_s, ring_db, ring_hz = np.transpose(loose_rings)
    rings = bursts(ring_s, ring_db, barrel_cycles / ring_hz, ring_hz) * (1 + 0.23 * walk(300))
    air = undb(-2.0) * band(push, TYRE_AIR_HZ, .06)
    return click + tail + undb(4.0) * body + rings + air + scuff


def thumps():
    """Tyre drops as short, sagging low sines; the air inside the tyre rings after the deep ones."""
    # Each row: time in seconds, relative level in dB, settled pitch in Hz.
    drops = [(0.025, -9.5, 70.4), (.659, -11, 45), (.683, -15.5, 167), (.944, -24, 97.2), (0.984, -15, 164),
             (1.053, -16.5, 56.6), (2.506, -16.5, 108), (2.611, -16, 81), (2.652, -13, 85),
             (2.727, -7.5, 75.2), (2.821, -11.5, 52.6), (2.849, -17, 75), (2.976, -13, 130),
             (3.101, -10.5, 87), (3.153, -7.5, 65), (3.219, -7, 100.3), (3.316, -16.5, 85.2),
             (3.39, -15, 70.5), (3.463, -14, 81.5), (3.665, -17, 95.5), (3.9, -8.5, 74),
             (3.945, -16, 260.6), (4.17, -22.5, 80), (4.2, -14, 260), (4.204, -19, 70), (4.258, -17.5, 69),
             (4.3, -14, 69.6), (4.337, -19, 75), (4.461, -19.5, 69.5), (4.563, -10.5, 268),
             (4.705, -13, 191), (4.76, -13, 140), (4.793, -11, 73.8), (4.839, -15.5, 103),
             (4.907, -19, 113), (5.005, -18, 185)]
    air_db, air_t60_s = -17, 0.096  # re the table level
    shortest_t60_s, sag_share = 0.0451, 0.47

    s, db, hz = np.transpose(drops)
    deep = hz < 170
    air_hz = np.full(deep.sum(), float(TYRE_AIR_HZ))
    air = bursts(s[deep], db[deep] + air_db, air_t60_s, air_hz)
    swings = bursts(s, db, np.maximum(5.1 / hz, shortest_t60_s), hz, sag=sag_share)
    return band(undb(5.5) * swings, 80, 2.1) + air


def pasta_breaks(small, large):
    """Breaking pieces as coloured noise at scattered pitches, with one sharp swing per loud snap."""
    # Each row: frequency in Hz, relative density in dB.
    snap_colour = [(880, -33.5), (1500, -11), (1850, -7), (2000, -12.5), (2930, -9), (4630, -6),
                   (9130, 1.5), (11700, -1.5), (15300, -24), (16300, -26)]
    whole_hz, whole_until_s = 4150, 2.385  # the first whole pieces break dull
    thick_hz, thick_db = 2760, -15  # lower crack of thick pieces while the heap is tall
    crack_hz, crack_db = 3800, 5  # re a clean snap, before filtering
    clean_t60_s = .003  # longer snaps crumble and swing less in proportion

    s, db, t60, _, _ = np.transpose(LOUD_SNAPS)
    t = np.arange(N) / SR
    # crumbs sound thinner than whole pieces
    bright = noise() * large + undb(-1.0) * band(noise() * small, 8500, 12.8)
    shards = np.arange(0, N / SR, .003)
    pitch = held(s, 8500 * 2 ** (0.3 * rng.standard_normal(len(s))))
    pitch = pitch * held(shards, 2 ** (.4 * rng.standard_normal(len(shards))))
    peaked = svf(bright, np.clip(pitch, 2500, 15000), 0.26)
    snaps = colour(0.84 * bright + 1.2 * peaked, snap_colour)
    snaps = np.where(t < whole_until_s, undb(6.0) * band(snaps, whole_hz, 0.63), snaps)
    snaps = snaps + (t < ROLLS_ON_S) * undb(thick_db) * band(bright, thick_hz, 0.88, 1.0)
    swing_db = db + crack_db - 20 * np.log10(np.maximum(t60 / clean_t60_s, 1))
    # negative frequency: the first swing is downward
    swing = bursts(s, swing_db, 2.5 / crack_hz, np.full(len(s), -float(crack_hz)))
    return snaps + band(swing, crack_hz, 1.8)


def gap_rings(small, gap_db, gap_hz):
    """The air gap under the tread rings at each snap's pitch and at a wandering crushing pitch."""
    ring_cycles, ring_hiss_db = 19.7, 7.5  # cycles to -60 dB; hiss drive re the table level
    s, _, t60, ring_db, ring_hz = np.transpose(LOUD_SNAPS)
    # no longer than a few times the snap itself
    ring_t60 = np.minimum(ring_cycles / ring_hz, 2.1 * t60)
    own = held(s, np.clip(ring_hz, 300, 3000))
    tones = undb(1.5) * svf(bursts(s, ring_db, ring_t60, ring_hz), own, 0.7)
    hiss = noise() * bursts(s, ring_db + ring_hiss_db, 1.4 * ring_t60)
    hiss = svf(svf(hiss, own, 0.49), own, 0.64)
    centre = np.clip(gap_hz * 2 ** (0.16 * walk(120)), 300, 3000)
    ring = noise() * uniform_filter1d(small, 80) * undb(gap_db + 17.5)
    for damp in (0.87, 0.97, 1.2):
        ring = svf(ring, centre, damp)
    return tones + hiss + ring


def tyre_wall(small, large, gap_hz):
    """Tyre wall and ground carry the low end of the crushing, weaker at higher gap pitches."""
    roll_db = 3  # extra boom once the tyre rolls over the heap
    rolls = np.arange(N) / SR > ROLLS_ON_S
    shake = noise() * uniform_filter1d(small + large, 60) * (950 / gap_hz) ** 2.2
    boom = undb(1.5 + roll_db * rolls) * band(shake, 190, .9, 1.2)
    return undb(-7.5) * band(shake, 340, 0.33) + boom


def pasta():
    """Loud snaps and random crackle drive the breaks, the gap under the tread and the tyre wall."""
    lull_creeping_db, lull_rolling_db = -8.5, -2  # crackle floor between snaps
    tick_db, tick_t60_s = 1.5, 0.0015  # first instant of a break, re the snap

    s, db, t60, _, _ = np.transpose(LOUD_SNAPS)
    crackle_db, gap_db, gap_hz = curve(CRUSHING)
    t = np.arange(N) / SR
    crushing = (t > CRUSHING[0][0]) & (t < CRUSHING[-1][0])
    grain = crushing * (crackle(600, 5.5, 0.0026) + 0.51 * crackle(140, 4.9, 0.007) + 0.28)
    # small breaks crowd in after each snap and die down before the next
    floor_db = np.where(t < ROLLS_ON_S, lull_creeping_db, lull_rolling_db)
    lull_db = np.clip(-600 * (t - held(s, s)), floor_db, 0)
    small = grain * undb(crackle_db + lull_db)
    # a snap splinters as it goes and leaves a short trail of crumbs
    large = bursts(s, db, t60, bend=1.31) * (0.22 + 0.67 * crackle(700, 4.0, 0.0019))
    large = large + bursts(s, db - 29.5, 0.025) + bursts(s, db + tick_db, tick_t60_s)
    return pasta_breaks(small, large) + gap_rings(small, gap_db, gap_hz) + tyre_wall(small, large, gap_hz)


def scene():
    """Sum of all sources, one channel."""
    return (town() + wind() + debris() + syringes() + thumps() + pasta())[None]


def record(dry):
    """Clip at full scale, then cut the top with a steep elliptic low-pass."""
    top_hz = 16100
    low_pass = signal.ellip(10, .2, 60, top_hz, fs=SR, output="sos")
    return signal.sosfilt(low_pass, np.clip(dry, -1, 1))


dry = scene()
out = record(dry)
wrap_up_sound(out)
```